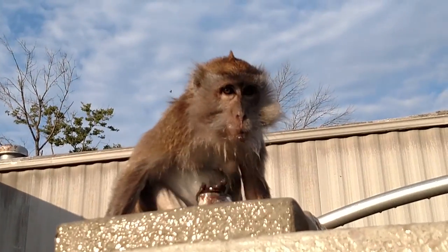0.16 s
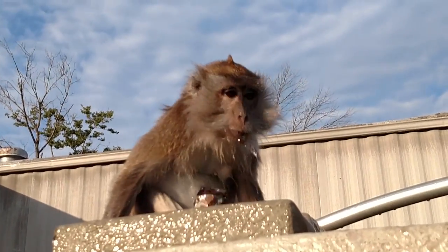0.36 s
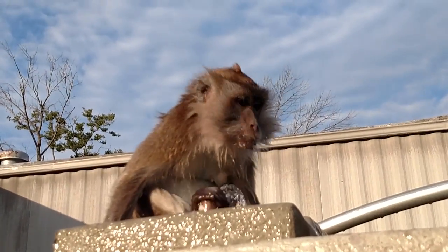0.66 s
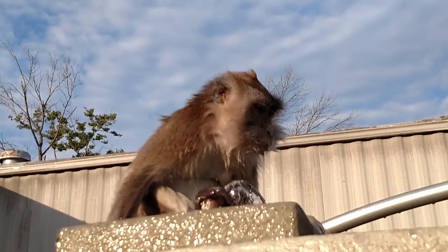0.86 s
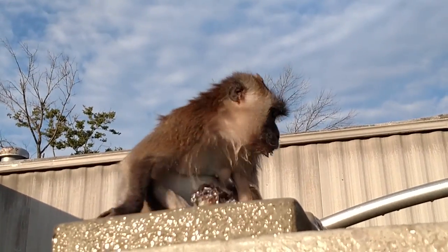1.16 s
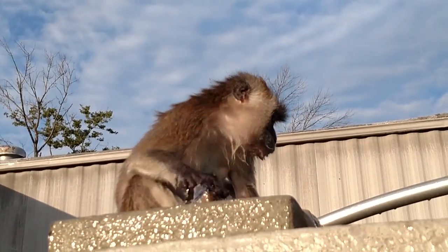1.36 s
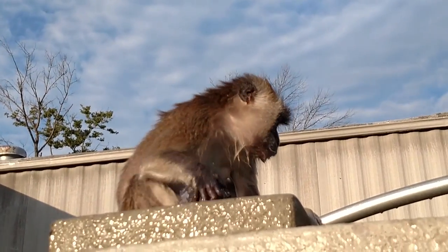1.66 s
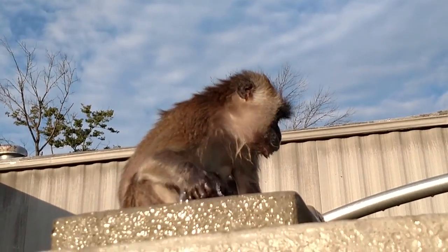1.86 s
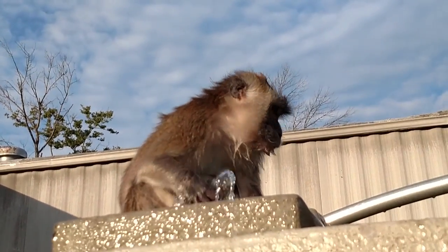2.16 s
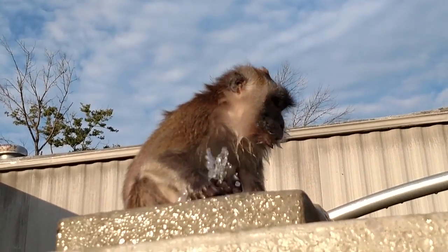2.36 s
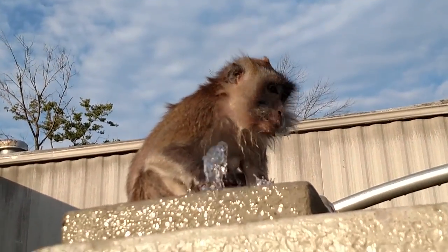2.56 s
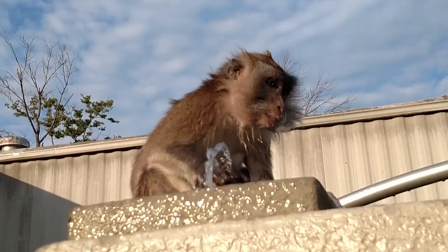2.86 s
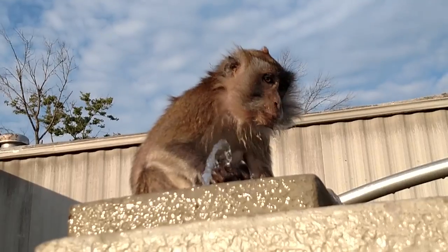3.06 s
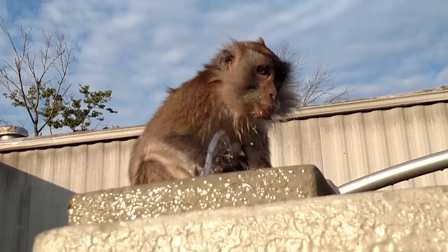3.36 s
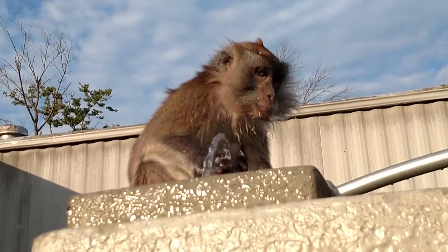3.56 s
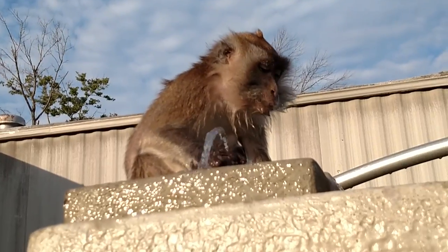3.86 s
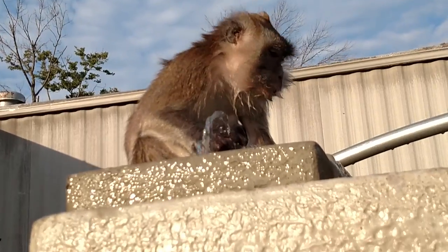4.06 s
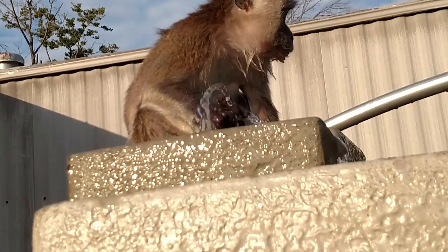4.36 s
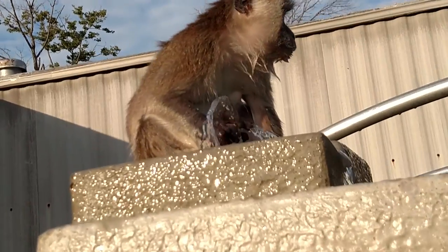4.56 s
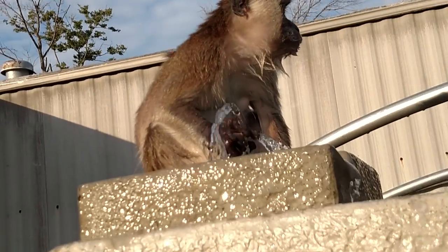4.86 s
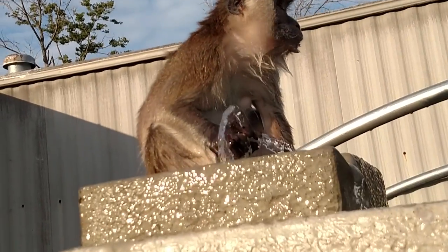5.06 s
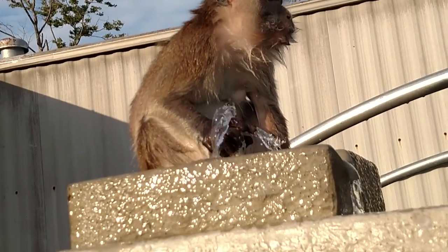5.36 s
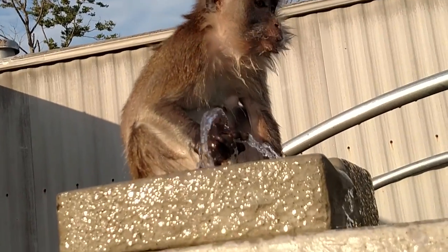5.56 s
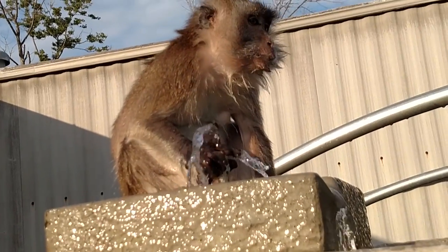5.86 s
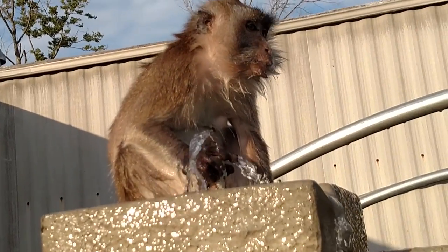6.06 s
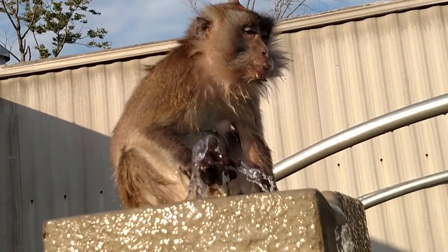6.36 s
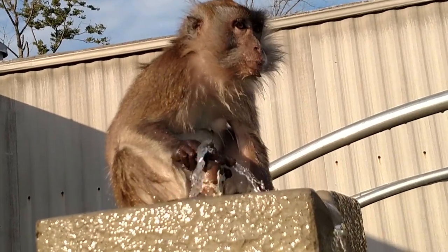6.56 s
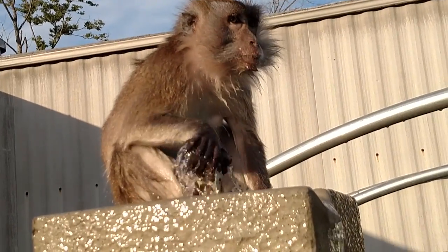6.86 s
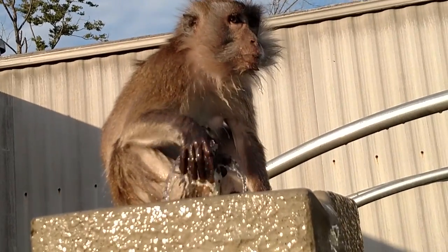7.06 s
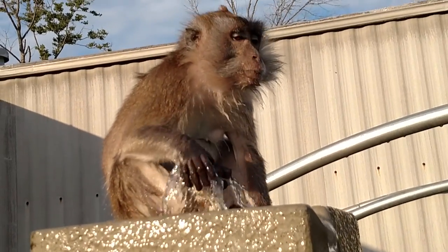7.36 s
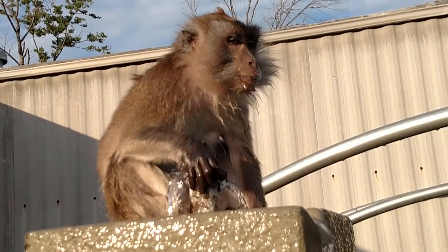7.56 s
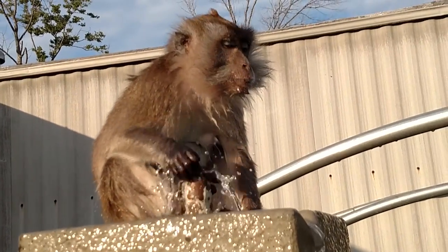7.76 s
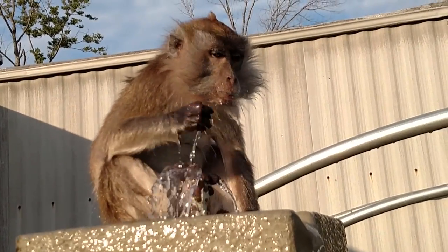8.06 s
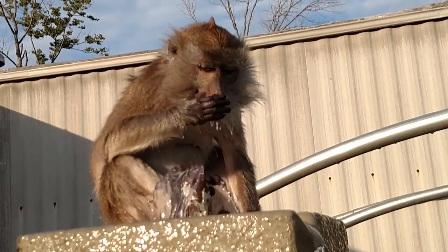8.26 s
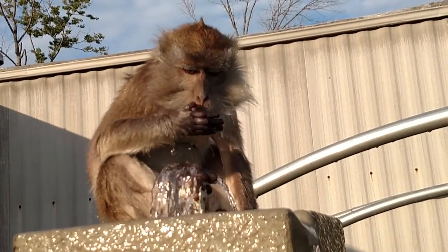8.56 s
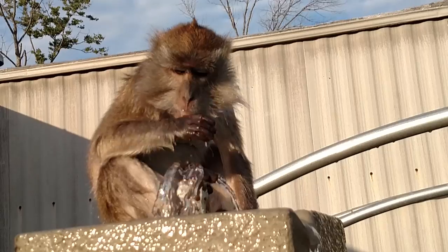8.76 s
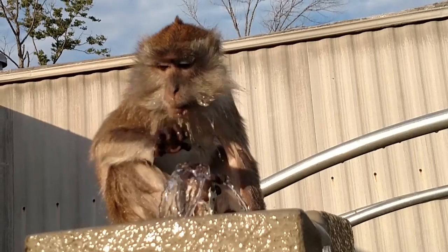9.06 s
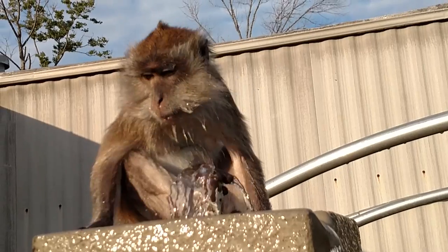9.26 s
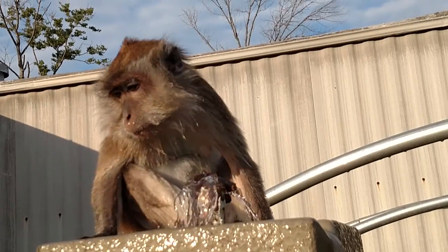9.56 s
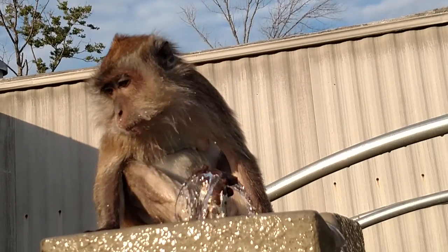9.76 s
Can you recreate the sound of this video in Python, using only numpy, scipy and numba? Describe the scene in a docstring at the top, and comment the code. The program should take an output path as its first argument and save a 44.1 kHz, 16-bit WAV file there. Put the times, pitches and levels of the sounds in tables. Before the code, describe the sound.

A small fountain jet runs throughout, close and dry in open air, spilling over a monkey's hands onto stone. Its hollow, uneven gurgle lies mostly at 250-800 Hz, with brighter bubbling, splash and very faint fizzing spray above. From about 0.5 to 3.3 s fingers break it into crisper spatter, which then fades and returns briefly around 6.8 s. Rounded bubble plops come irregularly, several per second at times; wet slaps hit stone, notably at 0.9, 4.8 and 8.3 s, and a sharp drop ticks at 3.9 s. Quick rising bubble runs occur near 0.8 and 4.4 s. Light wind rumbles, fluttering near 4 s. Dull low microphone thumps come softly at 0.4 and 4.1 s, strongly clustered at 5.1 s and again at 6.1-6.4 s. Faint steady motor hum continues behind; a tiny far bird whistles at 8.4 and 9.7 s.

```python
"""Outdoors, close to the microphone, a low fountain jet spills over a monkey's hands onto a stone block.
Uneven gushes excite decaying bubble tones and filtered noise: gurgle, splash, spatter and spray.
Larger bubbles ring as single damped sines; slaps and drops on the stone are resonant noise bursts.
Behind it motors hum as steady sinusoids and a far bird whistles two short calls.
A light breeze rumbles on the microphone as low-passed noise, with a flutter and dull buffets."""
import sys
import numpy as np
from scipy import signal
from scipy.fft import rfft, irfft
from scipy.io import wavfile
from scipy.ndimage import uniform_filter1d
from numba import njit

SR = 44100
rng = np.random.default_rng(int(sys.argv[2]) if len(sys.argv) > 2 else 0)


def waveform_to_disk(signal):
    """Save audio, clipped to [-1, 1], as 16-bit WAV at the path in sys.argv[1]."""
    frames = np.transpose(np.atleast_2d(signal))
    scaled = np.clip(frames, -1, 1) * 32767
    samples = np.round(scaled).astype(np.int16)
    wavfile.write(sys.argv[1], SR, samples)


N = 437031
T = np.arange(N) / SR  # time in seconds

# Spectral envelopes of the four layers of water. Each row: frequency in Hz, relative density in dB per Hz.
GURGLE_SPECTRUM = [(200, -18), (255, 0), (305, -8.5), (372, -2), (420, -7), (490, -3), (590, 2),
                   (680, -0.5), (790, -7), (1000, -14.5), (1500, -41.5)]
SPLASH_SPECTRUM = [(450, -22.5), (800, -0.5), (950, -0.5), (1200, -2), (1520, -2.5), (1900, -9.5),
                   (2350, -12), (2700, -18), (3200, -28), (4200, -24.5), (6000, -31.5)]
SPATTER_SPECTRUM = [(1200, -11.5), (2000, 0.5), (2500, 2), (3300, -9), (4200, -11.5), (6500, -17),
                    (10000, -31)]
SPRAY_SPECTRUM = [(1500, -5), (3000, -5), (3900, -13), (4500, -4), (5300, -4), (6300, -13), (7100, -2.5),
                  (8700, -12.5), (9920, -18), (10030, -8.5), (10150, -18), (12000, -18.5), (15500, -23)]
# Jet pressing against fingers, which break it into spatter. Each row: start in seconds, end in seconds,
# level in dB.
FINGERS = [(.45, 3.26, -60), (6.85, 6.8, -62.5)]
# The largest bubbles. Each row: start in seconds, initial pitch in Hz, relative level in dB.
LARGE_BUBBLES = [(.322, 355, -28), (.358, 620, -24.5), (.496, 620, -27), (.68, 680, -29),
                 (0.882, 1150, -24.5), (1.027, 467, -27), (1.398, 615, -22), (1.536, 610, -24.5),
                 (1.71, 625, -26), (2.236, 348, -25.5), (2.253, 630, -22.5), (2.477, 593, -26),
                 (3.056, 644, -24.5), (3.208, 353, -23.5), (3.345, 380, -29.5), (3.433, 473, -25.5),
                 (3.677, 1550, -22.5), (3.731, 480, -20), (3.982, 614, -22.5), (4.695, 560, -23),
                 (4.819, 504, -25.5), (5.378, 646, -23.5), (5.462, 885, -26), (5.748, 583, -23.5),
                 (5.887, 660, -27), (6.83, 367, -26.5), (7.132, 1206, -28.5), (7.349, 368, -27),
                 (7.393, 1350, -28.5), (7.454, 1020, -25.5), (8.011, 614, -25.5), (8.289, 517, -24.5),
                 (8.467, 630, -23), (8.585, 580, -25), (8.986, 900, -25.5), (9.668, 352, -26)]
# Water threads shedding ever smaller bubbles. Each row: start in seconds, first pitch in Hz,
# middle level in dB.
BUBBLE_TRILLS = [(0.821, 930, -33), (4.319, 1340, -34.5), (4.40, 1100, -40), (4.483, 1200, -41),
                 (7.038, 1830, -41), (8.308, 1410, -42)]
# Lumps of water slapping the stone. Each row: start in seconds, relative peak in dB, resonance in Hz.
STONE_SLAPS = [(.264, -25, 1070), (.458, -23.5, 910), (.879, -22.5, 1160), (2.198, -26, 1280),
               (2.679, -24.5, 725), (3.375, -26.5, 1200), (3.981, -27, 800), (4.813, -20.5, 990),
               (5.457, -25, 844), (8.269, -22.5, 950)]
# Sharp drops on the stone. Each row: start in seconds, peak in dB, resonance in Hz.
STONE_DROPS = [(.322, -38, 5160), (.880, -39, 5260), (1.383, -38.5, 5130), (1.948, -33, 4970),
               (3.206, -39.5, 5170), (3.809, -34.5, 5180), (3.880, -29, 6500), (4.207, -47, 13000),
               (5.948, -40, 5050), (6.075, -41, 5030), (6.734, -43, 5000), (9.780, -38, 4900)]
# Lines of a motor turning 55.6 times a second and of the mains. Each row: frequency in Hz,
# middle rms level in dB.
HUM_LINES = [(111.2, -56), (120, -58.5), (166.8, -63.5), (222.3, -53.5), (240, -50), (277.8, -65.5),
             (333.4, -53.5), (444.6, -63)]
# Calls of a small far bird. Each row: start in seconds, peak in dB.
BIRD_CALLS = [(8.375, -61), (9.68, -62)]
# Spectral envelope of wind rumble. Each row: frequency in Hz, relative density in dB per Hz.
RUMBLE_SPECTRUM = [(5, 2.5), (10, 5), (25, 1), (52, 0.5), (80, -3.5), (130, -8.5), (200, -10), (400, -31),
                   (1000, -34.5)]
# Gusts over the light breeze. Each row: start in seconds, end in seconds, middle level in dB.
GUSTS = [(.85, 1.15, -43), (3.75, 4.25, -37), (4.65, 4.85, -38), (6.3, 6.45, -32)]
# Puffs of air on the microphone. Each row: start in seconds, swing rate in Hz, peak of the swing in dB.
BUFFETS = [(.378, 111, -15.5), (4.120, 132, -18), (5.088, 84, -9), (5.111, 128, -5.5), (5.12, 119, -7),
           (5.134, 145, -1.5), (5.171, 94.5, -15), (6.072, 118, -6), (6.101, 97, -8.5), (6.13, 99, -16),
           (6.284, 89, -23.5), (6.342, 70, -15), (6.379, 150, -1)]

# The jet runs steadily; its pressure wanders a little and moves all its layers together.
GURGLE_DB, SPLASH_DB, SPRAY_DB = -40, -47, -61
WANDER_DB, WANDER_PER_S = 0.4, 2.6
FINGERS_ATTACK_S, FINGERS_RELEASE_S, FREE_SPATTER_DB = 0.2, 0.83, -73.5
# Every large bubble rings for the same number of cycles and rises by the same share of its pitch.
PLOP_CYCLES, PLOP_RISE = 28, 0.16
# Lesser bubbles come at random; the higher, the quieter.
STRAY_LO_HZ, STRAY_HI_HZ, STRAY_DB, STRAY_DB_PER_OCTAVE = 900, 2400, -28, -6.5
TRILL_S, TRILL_CLIMB = .033, 1.77  # length, and ratio of last pitch to first
# The pitch of a bird call turns at the share BIRD_TURN of its length.
BIRD_S, BIRD_HIGH_HZ, BIRD_DIP_HZ, BIRD_TURN = .08, 4000, 1050, .62
BREEZE_DB, GUST_ATTACK_S, GUST_RELEASE_S = -41.5, .08, .1
# The longest gust sheds eddies at a nearly steady rate.
FLUTTER_START_S, FLUTTER_END_S, FLUTTER_HZ, FLUTTER_DB = 3.9, 4.18, 42.8, -29
TOP_HZ = 15450  # upper band limit


def undb(db):
    """Definition of the decibel: an amplitude gain is ten to the power of dB / 20."""
    return 10 ** (np.asarray(db) / 20)


def unit(x):
    """Normalisation: a signal divided by its root mean square has rms 1."""
    return x / np.sqrt(np.mean(x ** 2))


def add(out, s, sound):
    """Superposition: a short sound is summed into the output from time s."""
    i = max(int(s * SR), 0)
    out[i:i + len(sound)] += sound[:max(N - i, 0)]


def walk(rate, count=4000):
    """Slow random modulation: levels held for 1 / rate seconds are smoothed twice and scaled to rms 1."""
    hold = max(int(SR / rate), N // count + 1)
    held = rng.standard_normal(count)[np.arange(N) // hold]
    smoothed = uniform_filter1d(held, hold)
    return unit(uniform_filter1d(smoothed, hold))


def swells(rows, attack_s, release_s):
    """Exponential envelopes: each (start s, end s, dB) event grows before its start and decays after its end."""
    total = 0
    for start, end, db in rows:
        growth = np.minimum(T - start, 0) / attack_s
        decay = np.maximum(T - end, 0) / release_s
        total = total + undb(db) * np.exp(growth - decay)
    return total


def colour(x, points):
    """Minimum-phase filtering: the envelope through (Hz, dB) points is causal, so attacks stay sharp; rms 1."""
    size = 16384
    hz, db = np.transpose(points)
    bins = np.maximum(np.arange(size // 2 + 1), .5) * SR / size
    gain = undb(np.interp(np.log(bins), np.log(hz), db))
    gain = gain / (1 + (bins / hz[-1] / 2) ** 2)  # falls off above the last point
    # folding the cepstrum onto positive times gives minimum phase
    cepstrum = irfft(np.log(gain))
    cepstrum[1:size // 2] *= 2
    cepstrum[size // 2 + 1:] = 0
    response = irfft(np.exp(rfft(cepstrum)))
    return unit(signal.fftconvolve(x, response)[:N])


@njit
def ring(start, hz, t60, size, rise):
    """Bubble resonance: a damped sine swells within a cycle and rises in pitch as the bubble nears the surface."""
    out = np.zeros(N)
    for k in range(len(start)):
        first = int(start[k] * SR)
        life = t60[k] * SR  # samples taken to decay by 60 dB
        step = np.exp((2j * np.pi * hz[k] / SR) - np.log(1000) / life)
        glide = np.exp(2j * np.pi * hz[k] / SR * rise / life)
        z, closed, opening = size[k] + 0j, 1., np.exp(-1.5 * hz[k] / SR)
        for i in range(max(first, 0), min(first + int(life), N)):
            out[i] += z.imag * (1 - closed)
            z, step, closed = z * step, step * glide, closed * opening
    return out


def gushes(rate, fade_s):
    """Shot noise: random lumps of water arrive at once and drain exponentially; mean 0, rms 1."""
    lumps = (rng.random(N) < rate / SR) * rng.uniform(0.33, 1, N)
    flow = signal.lfilter([1], [1, -np.exp(-1 / (fade_s * SR))], lumps)
    flow = np.sqrt(flow + flow.mean())
    return unit(flow - flow.mean())


def swarm(flow_db, lo_hz, hi_hz, cycles, spread_db, rise, count):
    """Bubble ensemble: many weak and a few strong resonances sum, stronger while a gush lands; rms 1."""
    when, pitch, bulk, damping = rng.random((count, 4)).T
    hz = lo_hz * (hi_hz / lo_hz) ** pitch
    rarity = -np.log(1 - .985 * bulk)
    size = hz * undb(spread_db * rarity + flow_db[(when * N).astype(int)])
    t60 = cycles * 2 ** (2 * damping - 1) / hz
    return unit(ring(when * N / SR, hz, t60, size, rise))


def patter(flow_db, spread_db, smear_s, count):
    """Random impacts: each tiny drop adds power that decays exponentially and modulates noise; rms 1."""
    when, bulk = rng.random((count, 2)).T
    at = (when * N).astype(int)
    rarity = -np.log(1 - .997 * bulk)
    power = np.bincount(at, undb(spread_db * rarity + flow_db[at]) ** 2, N)
    smeared = signal.lfilter([1], [1, -np.exp(-1 / (smear_s * SR))], power)
    return unit(np.sqrt(smeared) * rng.standard_normal(N))


def jet():
    """Excitation by turbulent flow: uneven gushes drive gurgling, brighter bubbling, spatter and fine spray."""
    fingers = np.hypot(undb(FREE_SPATTER_DB), swells(FINGERS, FINGERS_ATTACK_S, FINGERS_RELEASE_S))
    flow = gushes(rate=37, fade_s=0.013)
    scatter = gushes(rate=51, fade_s=0.009)  # thrown drops land in clusters of their own

    gurgle = swarm(2.05 * flow, lo_hz=233.8, hi_hz=945.4, cycles=24.2, spread_db=2.0, rise=0.14, count=4500)
    gurgle = gurgle + .8 * undb(flow) * rng.standard_normal(N)

    bubbles = swarm(1.4 * flow, lo_hz=731.0, hi_hz=4030, cycles=30.0, spread_db=2.5, rise=0.11, count=10000)
    wash = patter(1.24 * flow, spread_db=-1.5, smear_s=0.0055, count=14000)
    splash = .9 * bubbles + wash

    spatter = swarm(2.8 * flow, lo_hz=1863, hi_hz=6260, cycles=24, spread_db=4.5, rise=0.15, count=8000)

    fizz_db = 0.84 * flow + 3.6 * scatter
    fizz = swarm(fizz_db, lo_hz=3950, hi_hz=5880, cycles=29, spread_db=3.0, rise=0.17, count=4000)
    ticks = patter(0.86 * flow + 3.05 * scatter, spread_db=4.0, smear_s=0.00087, count=7000)
    specks = swarm(scatter, lo_hz=8500, hi_hz=14500, cycles=28, spread_db=3.0, rise=.05, count=700)
    mist = rng.standard_normal(N)
    spray = undb(-4) * ticks + undb(-8.0) * fizz + undb(-11.5) * specks + undb(-5.5) * mist

    pressure = undb(WANDER_DB * walk(WANDER_PER_S))
    return pressure * (undb(GURGLE_DB) * colour(gurgle, GURGLE_SPECTRUM)
                       + undb(SPLASH_DB) * colour(splash, SPLASH_SPECTRUM)
                       + fingers * colour(spatter, SPATTER_SPECTRUM)
                       + undb(SPRAY_DB) * colour(spray, SPRAY_SPECTRUM))


def plops(count=18):
    """Free oscillation of air pockets: large bubbles ring above the swarm, with lesser ones strewn between."""
    s, hz, db = np.array(LARGE_BUBBLES, float).T.copy()
    large = undb(2.1) * ring(s, hz, PLOP_CYCLES / hz, undb(db), PLOP_RISE)
    when, pitch = rng.random((count, 2)).T
    stray_s = (np.arange(count) + when) / count * N / SR
    stray_hz = STRAY_LO_HZ * (STRAY_HI_HZ / STRAY_LO_HZ) ** pitch
    stray_db = STRAY_DB + STRAY_DB_PER_OCTAVE * np.log2(stray_hz / STRAY_LO_HZ)
    stray = ring(stray_s, stray_hz, PLOP_CYCLES / stray_hz, undb(stray_db), PLOP_RISE)
    return large + stray


def trills(count=9):
    """Inverse relation of size and pitch: a thread sheds ever smaller bubbles, so a quick run climbs."""
    out = 0
    for s, first_hz, db in BUBBLE_TRILLS:
        along = (np.arange(count) + rng.random(count)) / count
        hz = first_hz * TRILL_CLIMB ** along
        size = undb(db + 2 * rng.standard_normal(count))
        out = out + ring(s + TRILL_S * along, hz, 22 / hz, size, 0.05)
    return out


def impacts(table, fade_s, sharpness):
    """Impact excitation: water on stone is a rapidly decaying noise burst shaped by one broad resonance."""
    out, t = np.zeros(N), T[:SR // 20]
    for s, db, hz in table:
        burst = rng.standard_normal(len(t)) * np.exp(-t / fade_s)
        hit = signal.lfilter(*signal.iirpeak(hz, max(sharpness, 1), SR), burst)
        hit = signal.lfilter(*signal.iirpeak(hz, 1, SR), hit)
        add(out, s + 0.00084, undb(db) * hit / np.abs(hit).max())
    return out


def motors():
    """Periodic machine vibration: steady lines waver in level and phase on their way through the air."""
    hum = 0
    for hz, db in HUM_LINES:
        level = np.sqrt(2) * undb(db + 2.06 * walk(4.5))  # rms to peak
        hum = hum + level * np.sin(2 * np.pi * hz * T + 0.85 * walk(3))
    return hum


def bird():
    """Frequency modulation: each thin whistle dips in pitch and climbs part of the way back."""
    out, along = np.zeros(N), np.linspace(0, 1, int(BIRD_S * SR))
    hz = BIRD_HIGH_HZ - BIRD_DIP_HZ * (1 - np.abs(along / BIRD_TURN - 1))
    envelope = np.sqrt(4 * along * (1 - along))
    whistle = envelope * np.sin(2 * np.pi * np.cumsum(hz) / SR)
    for s, db in BIRD_CALLS:
        add(out, s, undb(db) * whistle)
    return out


def breeze():
    """Turbulent pressure noise: unsteady low rumble swells in gusts, with a lopsided flutter of shed eddies."""
    wind = np.hypot(undb(BREEZE_DB), swells(GUSTS, GUST_ATTACK_S, GUST_RELEASE_S))
    rumble = wind * undb(2.3 * walk(3.6)) * colour(rng.standard_normal(N), RUMBLE_SPECTRUM)
    phase = 2 * np.pi * np.cumsum(FLUTTER_HZ * (1 + .13 * walk(45))) / SR
    # the second harmonic makes the swing lopsided
    eddies = (np.cos(phase) + 0.46 * np.cos(2 * phase)) * undb(3.2 * walk(50))
    flutter = swells([(FLUTTER_START_S, FLUTTER_END_S, FLUTTER_DB)], attack_s=0.053, release_s=.09)
    return rumble + eddies * flutter


def buffets(damping, wake_db, wake_s):
    """Damped membrane motion: a puff shoves the microphone, which swings back as eddies rumble on behind."""
    out, wake, t = np.zeros(N), np.zeros(N), T[:SR // 3]
    for s, hz, db in BUFFETS:
        turns = hz * t
        swing = turns * np.exp(-damping * turns) * np.sin(2 * np.pi * turns)
        add(out, s - .001, -undb(db) * swing / np.abs(swing).max())
        add(wake, s, undb(db + wake_db) * np.tanh(turns) ** 2 * np.exp(-t / wake_s))
    # pairs of Hz and relative dB per Hz
    wake_spectrum = [(20, 0), (90, 7), (200, -19), (400, -37), (1000, -62)]
    return out + wake * colour(rng.standard_normal(N), wake_spectrum)


def scene():
    """Superposition of sources: water in front, motors and a bird behind, wind on the microphone."""
    water = jet() + plops() + trills()
    slaps = undb(-2) * impacts(STONE_SLAPS, fade_s=0.0027, sharpness=2.8)
    drops = impacts(STONE_DROPS, fade_s=0.0027, sharpness=5.8)
    background = motors() + bird()
    wind = breeze() + buffets(damping=3.34, wake_db=-27.0, wake_s=0.05)
    return (water + slaps + drops + background + wind)[None]


def record(dry):
    """Band limitation: a steep elliptic low-pass filter removes the top of the spectrum."""
    low_pass = signal.ellip(10, .1, 80, TOP_HZ, fs=SR, output="sos")
    return signal.sosfilt(low_pass, dry)


dry = scene()
out = record(dry)
waveform_to_disk(out)
```